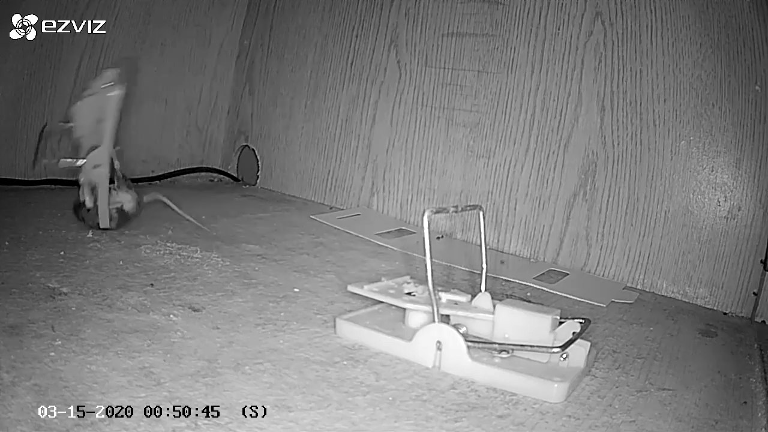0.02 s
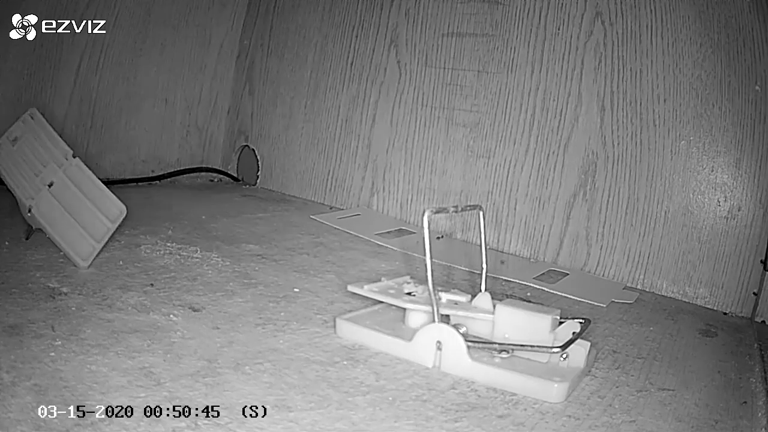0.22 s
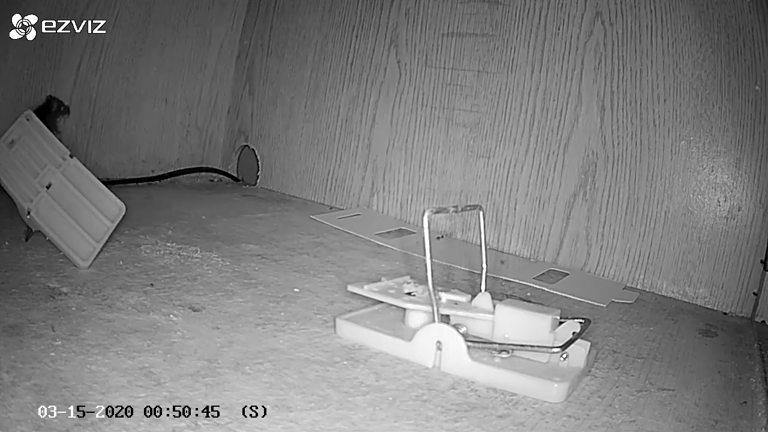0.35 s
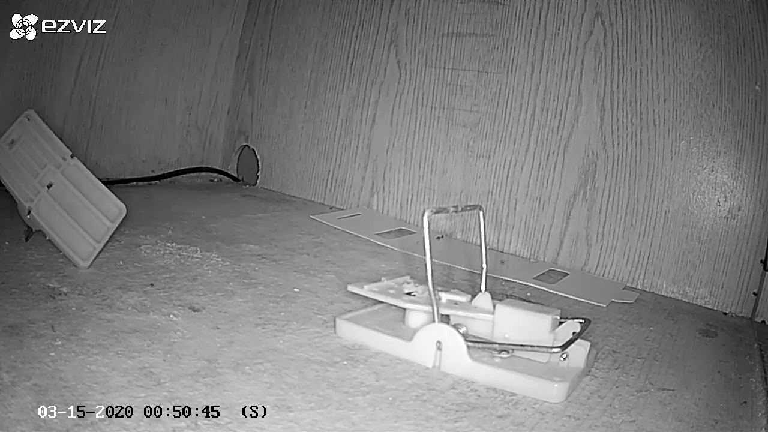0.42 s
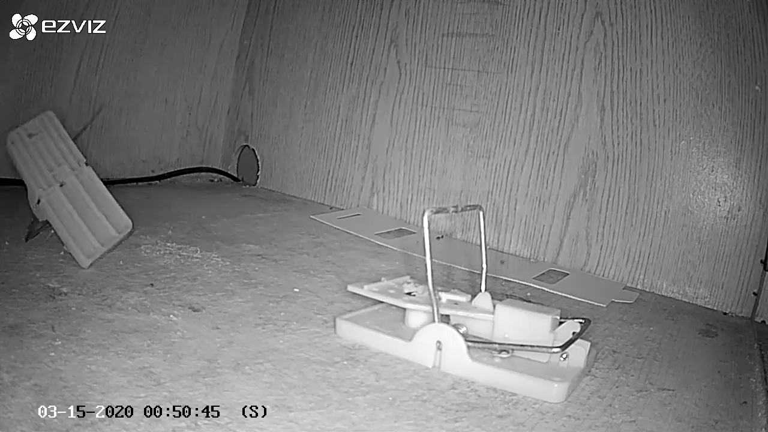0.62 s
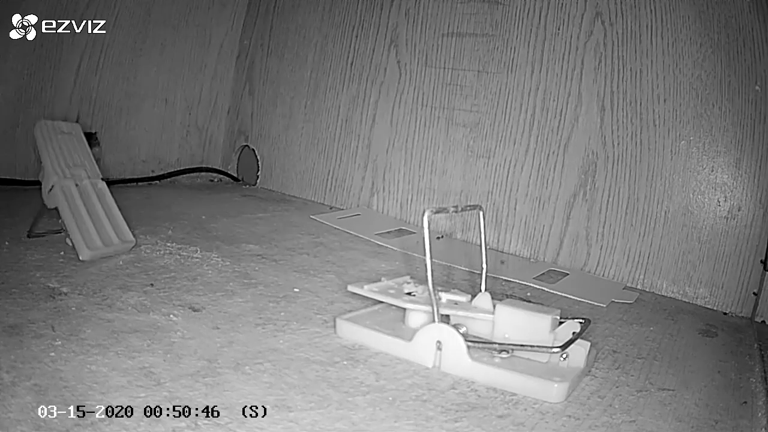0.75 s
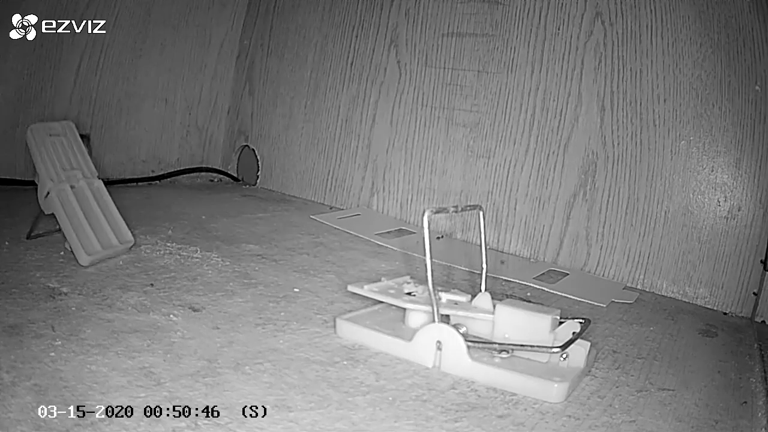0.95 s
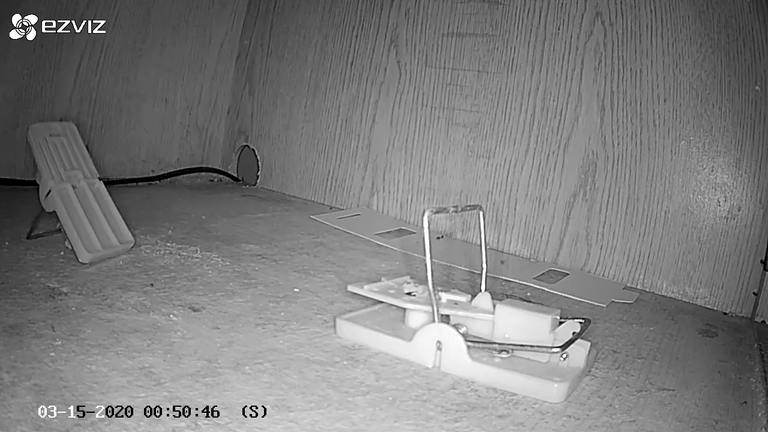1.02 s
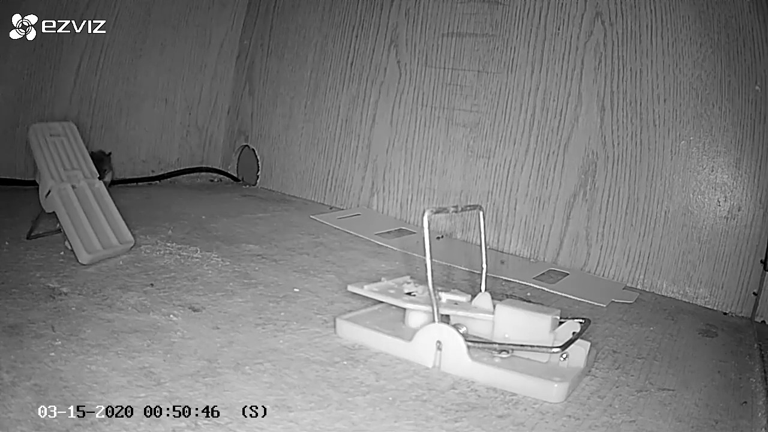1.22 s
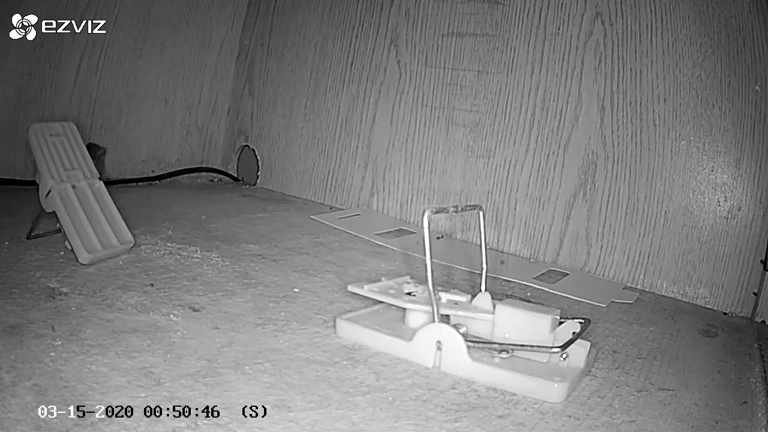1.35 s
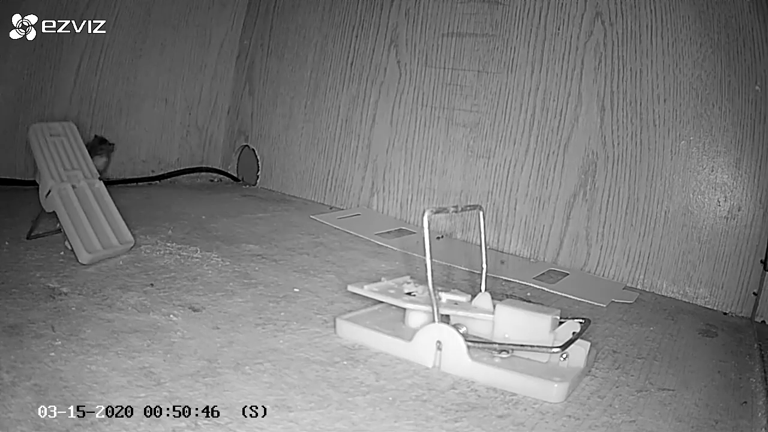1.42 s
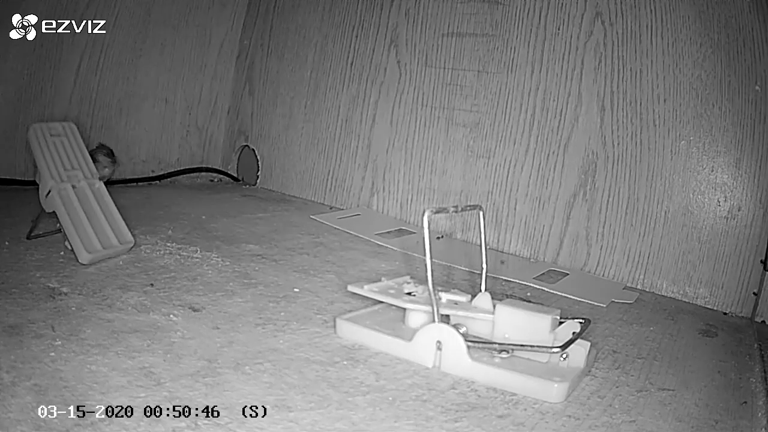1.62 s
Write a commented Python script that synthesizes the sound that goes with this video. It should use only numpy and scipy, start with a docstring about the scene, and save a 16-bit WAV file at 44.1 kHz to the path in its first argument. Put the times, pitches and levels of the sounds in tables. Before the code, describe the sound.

A plastic snap trap knocks and scrapes inside a wooden cupboard, close by. From about 0.2 to 0.4 seconds it clatters loudly, with sharp clacks and hollow booms. After a brief lull, a weaker cluster of knocks comes from 0.8 to 1.1 seconds. Soft bumps, gritty dragging and tiny wire and claw ticks follow, dying away by about 1.6 seconds over a faint house rumble.

```python
"""A plastic snap trap, with a small animal caught in it, bangs about inside a wooden cupboard.
Every knock booms in the floor, wall and boards; hard hits clack and rattle in the plastic.
Between them the animal drags the trap: it scrapes over grit, its spring sings, wire and claws tick.
The microphone, in a small camera, stands close by on the same floor in the faint rumble of the house
and overloads on the loudest blows."""
import sys
import numpy as np
from scipy import signal
from scipy.fft import rfft, irfft
from scipy.io import wavfile

SR = 44100
rng = np.random.default_rng(int(sys.argv[2]) if len(sys.argv) > 2 else 0)


def store_wav(level_fs):
    """Save 16-bit WAV to argv[1]."""
    pcm = np.round(np.clip(np.atleast_2d(level_fs), -1, 1) * 32767)
    wavfile.write(sys.argv[1], SR, pcm.T.astype(np.int16))


N = 74970
CRACK_S = .003  # time constant of a hard contact
TREBLE_HZ = 2040  # crossover between body and treble


def knocks():
    """The trap strikes wood; where it lands decides how much floor, wall, boards and panels ring."""
    # blows on the cupboard: t/s, floor thud/dB, wall boom/dB, board/dB, panel ring/dB
    blows = [(0.0014, -38.5, -49, -66, -31.5), (0.0846, -18, -18, -21, -30.5),
             (0.1588, -22.5, -23, -26, -56.5), (0.1885, -27.5, -41, -17.5, -49),
             (0.206, -3.5, -8, -3.5, -11.5), (0.2177, -5.5, -32, -27, -14.5),
             (0.243, -8.5, -45, -27.5, -24), (0.3, -4, -2.5, -8, -17.5),
             (0.3244, -18.5, -4.5, -12.5, -14.5), (0.3357, -13, -38, -53.5, -22.5),
             (0.352, -5.5, -22, -20.5, -23), (0.3659, -15, -12.5, -48.5, -20.5),
             (0.3823, -17.5, -7.5, -54, -37), (0.4632, -35.5, -37, -32, -38),
             (0.6217, -50, -49, -52.5, -43), (0.6511, -42, -41, -40, -58), (0.737, -30.5, -32, -32, -43.5),
             (0.7841, -9.5, -55, -15, -34.5), (0.792, -53.5, -11.5, -45.5, -34.5),
             (0.8229, -39, -66, -67.5, -37.5), (0.875, -36, -34, -61.5, -37.5),
             (0.9152, -14.5, -18.5, -19.5, -29), (0.9281, -12.5, -13, -18, -26.5),
             (0.949, -48.5, -30, -30, -33), (1.0004, -18.5, -19.5, -46, -48.5),
             (1.0334, -21.5, -23, -48.5, -43), (1.0817, -29.5, -18, -29, -39.5),
             (1.172, -26.5, -47.5, -44, -50.5), (1.2086, -30, -25, -37.5, -59),
             (1.221, -30.5, -34, -36.5, -57), (1.269, -46, -42.5, -35.5, -46.5),
             (1.302, -37, -29.5, -42, -56.5), (1.3373, -36, -31.5, -53, -61),
             (1.3691, -37.5, -39, -70, -71.5), (1.4428, -41, -36, -42, -66.5),
             (1.491, -74.5, -53, -43.5, -72.5), (1.5632, -58.5, -51, -42.5, -67),
             (1.5868, -58, -53, -44.5, -61)]
    # modes of the floor, wall, boards and thin panels, each: f/Hz, level/dB, t60/s
    floor = [(69, -22.5, 0.97), (77.4, -18, .23), (99.54, 4, 0.11), (126.5, -4, 0.092)]
    wall = [(152.6, 0, 0.18), (164.78, -1, .2)]
    boards = [(235, -6.5, 0.035), (288.8, -4, 0.2), (337, -14, 0.076), (338.1, -18.5, .22)]
    panels = [(420.74, -6, .56), (445.5, -5, 0.47), (506.5, -13.5, 0.26), (547, -5.5, .2), (589, -13, 0.54),
              (627, -14.5, .1), (650.7, -13.5, 0.25), (688, -15, .28), (736.1, -12, .25), (784, -17.5, .11),
              (844, -24, 0.29), (870, -28, 0.56), (978, -29.5, 0.39)]
    parts = [ring(floor, rise_s=.0044), ring(wall, rise_s=.009),
             ring(boards, rise_s=.0039), ring(panels, rise_s=.0029)]
    out = np.zeros(N)
    for s, *levels_db in blows:
        add(out, s, sum(undb(db) * part for db, part in zip(levels_db, parts)))
    return out


def clacks():
    """Hard hits: a crack, the trap's own modes and the cupboard's dense ring, whose treble dies first."""
    # hits of hard plastic: t/s, level/dB, relative treble/dB, relative trap ring/dB
    hits = [(0.0, -42.5, 4, 5.5), (0.074, -36.5, -5, -5), (0.208, -35, 2.5, -20), (0.2162, -23, 2.5, 1),
            (0.2215, -30, -3, 2), (0.228, -28.5, -5, -4.5), (0.3027, -29, -0.5, -4.5),
            (0.323, -37.5, 5.5, 1), (0.335, -37.5, -13.5, 1.5), (0.352, -45.5, 3, -3.5),
            (0.367, -47, -9, -10.5), (0.389, -44, 0.5, -9), (0.410, -58.5, -0.5, -10.5),
            (0.737, -65, -6, -9), (0.785, -58.5, -11.5, -9), (0.794, -46, -10.5, -14),
            (0.811, -52.5, -9.5, -10.5), (0.912, -53, -15.5, -13), (0.9263, -47.5, -15.5, -4.5),
            (0.984, -59.5, -11.5, -8), (1.279, -69, -15.5, -19)]
    # spectrum of a clack in the cupboard: f/Hz, level/dB
    spectrum = [(300, -2.5), (550, 10), (800, 6.5), (1000, -1), (1300, -3), (1900, -5), (2400, -5.5),
                (2900, -6.5), (3600, -12.5), (4400, -12), (5100, -5), (5800, -10), (6550, -9),
                (7200, -15.5), (8000, -24.5), (9000, -39.5)]
    # modes of the plastic trap: f/Hz, level/dB, t60/s
    trap_modes = [(1101, -5, 0.39), (1178, -11, 0.18), (1306, -12, 0.15), (1501, -9.5, 0.32),
                  (1723, -9.5, 0.17), (1813, -10, 0.25), (2370, -5.5, 0.12), (2910, -12.5, .17),
                  (3300, -21.5, .35), (4800, -11.5, .2), (5230, -10.5, 0.13), (5390, -17, .28),
                  (6580, -15, .2)]
    out, t = np.zeros(N), np.arange(N) / SR
    crack = undb(1) * np.exp(-t / CRACK_S)
    body_fade, treble_fade = fade(t60=.4) + crack, fade(t60=.3) + crack
    modes = np.array([undb(db) * fade(t60) * np.exp(2j * np.pi * hz * t) for hz, db, t60 in trap_modes])
    for s, db, treble_db, ring_db in hits:
        body, treble = split_bands(colour(rng.standard_normal(N), spectrum))
        burst = body * body_fade + undb(treble_db) * treble * treble_fade
        phases = np.exp(2j * np.pi * rng.random(len(trap_modes)))
        trap_ring = undb(ring_db) * (phases @ modes).imag
        add(out, s, undb(db) * (burst + trap_ring))
    return out


def scrape():
    """Plastic catches on grit: dense uneven clicks ring briefly and stir the spring; slow is duller."""
    # course of the slide over the floor: t/s, level/dB, relative treble/dB
    slide = [(0, -49, -13), (0.061, -41.5, 1.5), (0.11, -48, 1.5), (0.15, -41, 1), (0.2, -29, -1.5),
             (0.25, -39.5, 0.5), (0.29, -46, -5), (0.36, -42.5, 2), (0.42, -53, 5), (0.5, -53.5, -10.5),
             (0.599, -65, -13.5), (0.715, -71.5, -6.5), (0.745, -54.5, -3), (0.785, -50.5, -3.5),
             (0.819, -50, 8), (0.881, -55.5, -5.5), (0.959, -48, -12.5), (1.039, -62, -5.5),
             (1.13, -60.5, -4.5), (1.231, -70, 1), (1.299, -66.5, -4.5), (1.401, -84.5, -4), (1.6, -88, -4),
             (1.66, -70.5, -10), (1.7, -76, -8.5)]
    # spectrum of the sliding: f/Hz, level/dB
    spectrum = [(100, -0.5), (290, 8.5), (430, 9), (560, 6), (750, 3.5), (1000, -2), (1200, 2.5),
                (1600, -7), (2500, -6), (3600, -6.5), (4300, -9.5), (5000, -10.5), (5800, -11),
                (6550, -7.5), (7200, -20.5), (8000, -28), (9000, -52.5)]
    # modes of the wire spring: f/Hz, level/dB, t60/s
    spring_modes = [(1100, -6.5, .2), (1745, -8, .3), (2092, -4, 0.44), (2597, -6, 0.29), (3406, -6.5, .25),
                    (4640, -7.5, .12), (4910, -10.5, 0.12)]
    grains_per_s, spread_db, spring_db = 3000, 4, -13.5
    size, sign, tail = rng.standard_normal((3, N))
    catches = rng.random(N) < grains_per_s / SR
    grains = catches * undb(spread_db * size) * np.sign(sign)
    grit = colour(signal.fftconvolve(grains, tail * fade(t60=.078))[:N], spectrum)
    spring = unit(signal.fftconvolve(grains, ring(spring_modes, rise_s=CRACK_S))[:N])
    body, treble = split_bands(grit + undb(spring_db) * spring)
    s, db, treble_db = np.array(slide).T
    t = np.arange(N) / SR
    treble *= undb(np.interp(t, s, treble_db))
    return (body + treble) * undb(np.interp(t, s, db))


def ticks():
    """Wire and claws tap: a tiny click and a brief narrow ring that lingers in the cupboard."""
    # taps of wire and claws: t/s, ring level/dB, f/Hz, click level/dB
    taps = [(0.124, -37, 6425, -39.5), (0.127, -48, 3070, -59.5), (0.154, -48, 4800, -58),
            (0.172, -43.5, 4670, -55.5), (0.4675, -62, 4700, -47.5), (0.927, -60, 4780, -61),
            (0.948, -55, 4290, -67), (0.952, -69.5, 6150, -68), (1.0433, -64, 4130, -70),
            (1.044, -63, 3420, -81), (1.1066, -71, 4960, -62), (1.1932, -65.5, 4020, -66),
            (1.196, -72, 2070, -84), (1.641, -78, 3830, -78.5)]
    half_width_hz = 225
    out = np.zeros(N)
    click_fade = np.exp(-np.arange(N) / SR / CRACK_S)
    ring_fade = fade(t60=.049) + undb(-9) * fade(t60=.35)  # the tick, then the cupboard's tail
    for s, ring_db, hz, click_db in taps:
        noise = rng.standard_normal(N)
        band = filt(noise, [hz - half_width_hz, hz + half_width_hz], "band")
        tone = unit(band[::-1])  # reversed, so it starts at full strength
        click = unit(filt(noise, [2000, 6000], "band", order=4))
        add(out, s, undb(ring_db) * tone * ring_fade + undb(click_db) * click * click_fade)
    return out


def house_rumble():
    """Room tone: the faint, steady low noise of the house."""
    # spectrum of the rumble: f/Hz, level/dB
    spectrum = [(12, -21.5), (25, -4), (40, -8), (58, 12), (72, -3.5), (110, -19), (165, -10.5), (220, -36),
                (295, -12.5), (470, -39), (1000, -43.5), (2000, -55), (6000, -55.5), (9000, -77.5)]
    return undb(-43) * colour(rng.standard_normal(N), spectrum)


def ring(modes, rise_s):
    """Decaying modes that build up as a blow spreads through the material."""
    t = np.arange(N) / SR
    x = sum(undb(db) * np.sin(2 * np.pi * hz * t) * fade(t60) for hz, db, t60 in modes)
    return x * (1 - np.exp(-t / rise_s))


def undb(db):
    """Decibels to gain."""
    return 10 ** (np.asarray(db) / 20)


def unit(x):
    """Scale to rms 1."""
    return x / np.sqrt(np.mean(x ** 2))


def fade(t60):
    """Exponential decay from 1, down 60 dB after t60 seconds."""
    return np.exp(-np.log(1000) * np.arange(N) / SR / t60)


def add(out, s, x):
    """Mix a sound in from time s."""
    i = max(int(s * SR), 0)
    out[i:] += x[:N - i]


def colour(x, points):
    """Shape with a spectrum of (f/Hz, level/dB) points; rms 1."""
    hz, db = np.array(points).T
    f = np.maximum(np.fft.rfftfreq(N, 1 / SR), 1)
    gain = undb(np.interp(np.log(f), np.log(hz), db))
    return unit(irfft(rfft(x) * gain, N))


def filt(x, hz, kind, order=2):
    """Butterworth filter."""
    return signal.sosfilt(signal.butter(order, hz, kind, fs=SR, output="sos"), x)


def split_bands(x):
    """The body below the crossover and the treble above it."""
    return filt(x, TREBLE_HZ, "low", order=3), filt(x, TREBLE_HZ, "high", order=3)


def scene():
    """The struggle as heard on the cupboard floor, over the rumble of the house; mono."""
    return (knocks() + clacks() + ticks() + scrape() + house_rumble())[None]


def record(dry):
    """The close microphone flattens the biggest swings; the deepest bass and the top are cut."""
    ceiling, low_cut_hz, top_hz = .66, 14, 8650
    flattened = dry / (1 + (dry / ceiling) ** 4) ** (1 / 4)
    steep_low_pass = signal.ellip(12, .2, 80, top_hz, fs=SR, output="sos")
    return signal.sosfilt(steep_low_pass, filt(flattened, low_cut_hz, "high", order=1))


dry = scene()
out = record(dry)
store_wav(out)
```